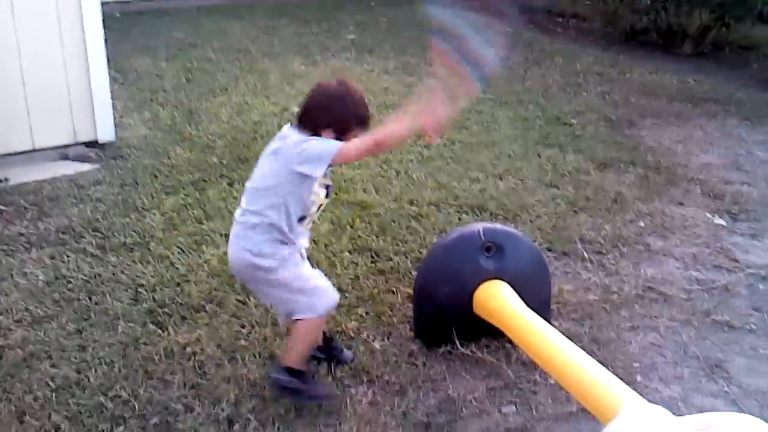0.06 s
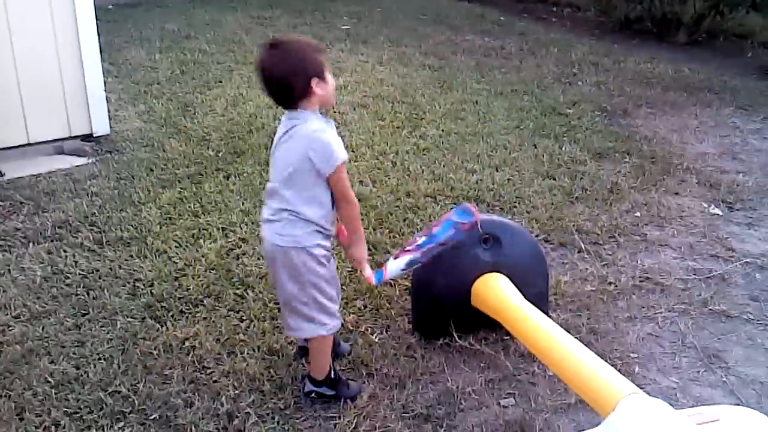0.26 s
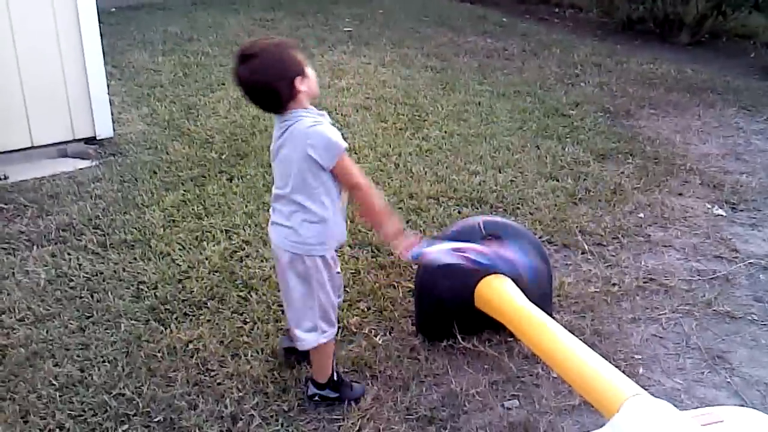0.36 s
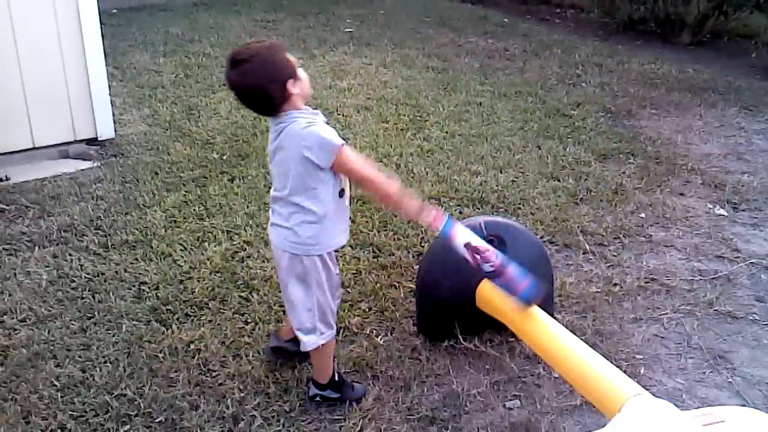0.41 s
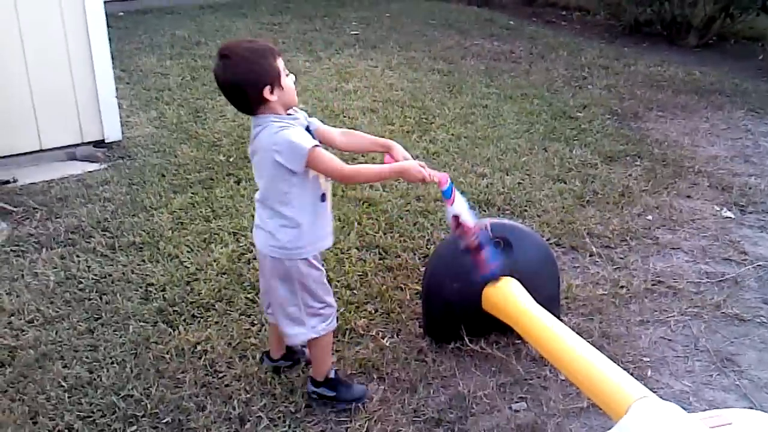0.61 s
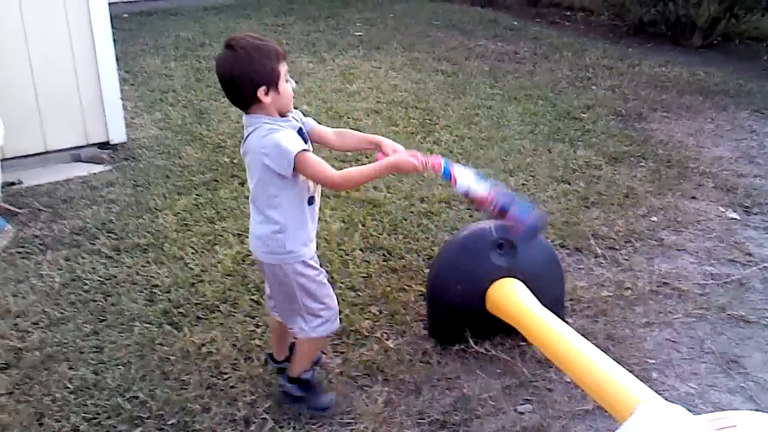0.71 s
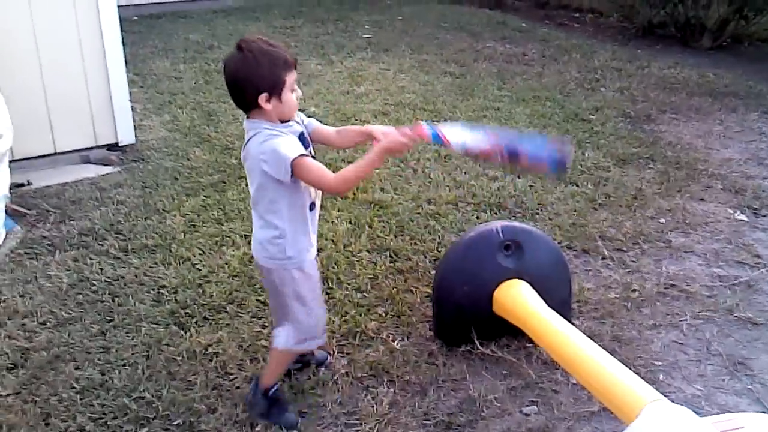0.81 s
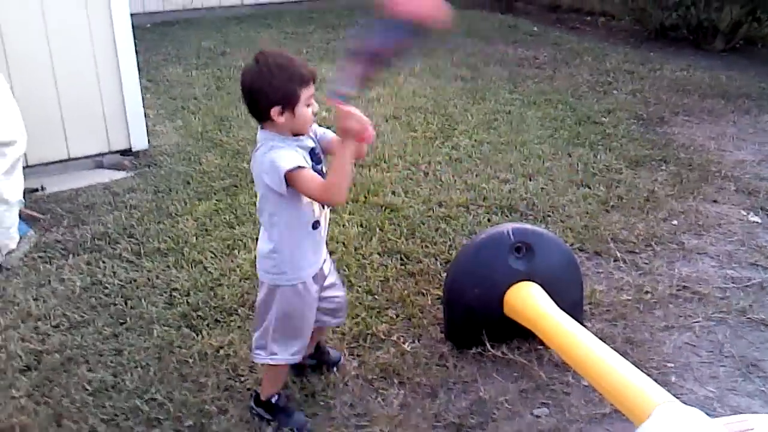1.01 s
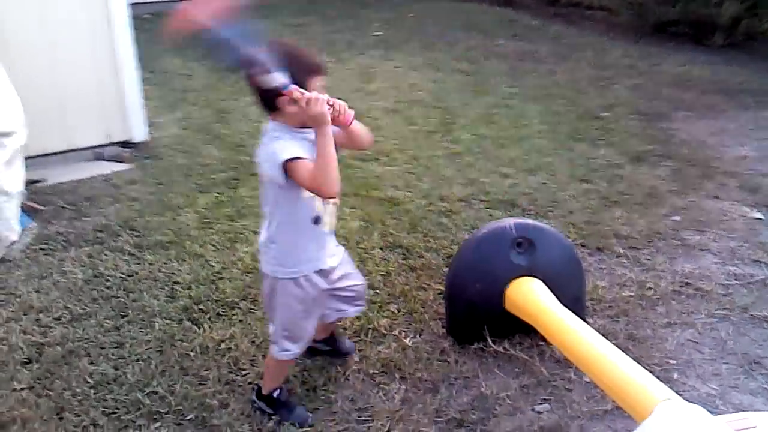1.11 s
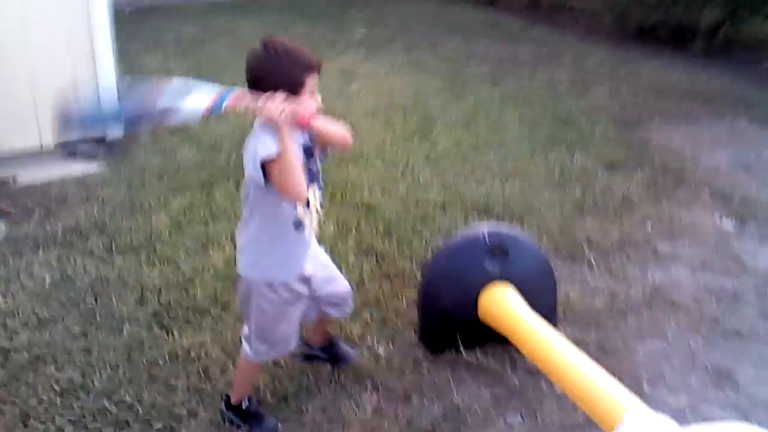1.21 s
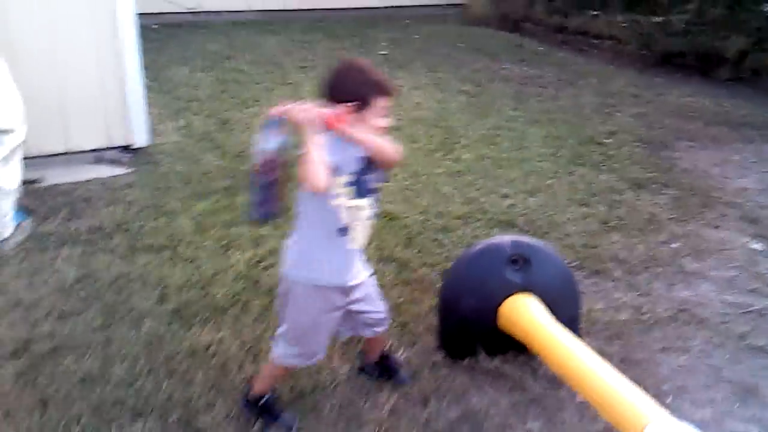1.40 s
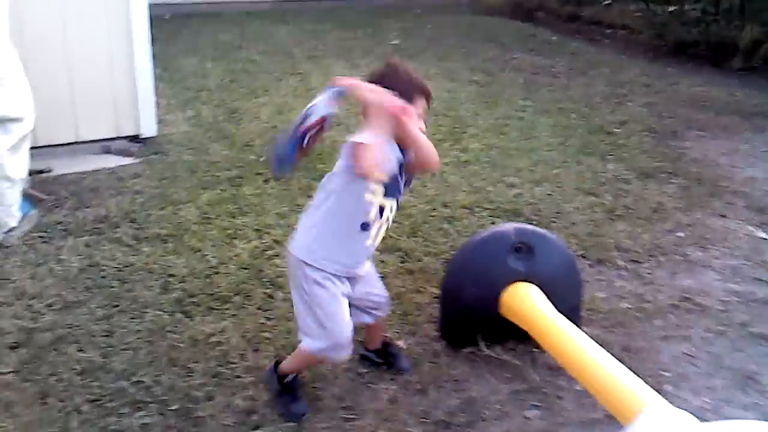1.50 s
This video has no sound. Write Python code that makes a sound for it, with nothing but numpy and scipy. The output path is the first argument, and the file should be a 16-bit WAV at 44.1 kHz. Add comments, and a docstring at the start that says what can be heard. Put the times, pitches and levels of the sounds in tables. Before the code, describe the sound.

A toy bat whacks the hollow plastic base of a toy basketball hoop once, close by in a quiet yard. A faint scrape and a few small plastic clicks follow, with soft rustling and a distant motor hum.

```python
"""On a lawn in a yard, a hollow toy bat whacks the hollow plastic base of a toy basketball hoop.
The impact dents the wall with a thump; as the bat flattens, each contact excites damped modes of cavity
and wall and a crack of dense high modes. The yard answers faintly by scattering and reflection.
The bat scrapes off the dome with sliding friction and, lifted, gives a few small plastic clicks.
Clothes and grass rustle, and the hum of a distant motor swells and sinks over quiet outdoor air."""
import sys
import numpy as np
from scipy import signal
from scipy.fft import rfft, irfft, next_fast_len
from scipy.io import wavfile

SR = 44100
rng = np.random.default_rng(int(sys.argv[2]) if len(sys.argv) > 2 else 0)


def master_out(mix):
    """Clip the mix to full scale and print it as 16-bit PCM to the path in sys.argv[1]."""
    frames = np.transpose(np.atleast_2d(mix))
    ceiling = np.clip(frames, -1, 1)
    pcm = np.round(ceiling * 32767).astype(np.int16)
    wavfile.write(sys.argv[1], SR, pcm)


N = 68355
T = np.arange(N) / SR


def from_db(db):
    """Amplitude ratio of a level in decibels."""
    return 10 ** (np.asarray(db) / 20)


def rms_one(x):
    """Normalisation to unit rms."""
    return x / np.sqrt(np.mean(x ** 2) + 1e-20)


def at_hz(table, hz, column=1):
    """Interpolation of a table column over log frequency."""
    table = np.array(table)
    return np.interp(np.log(hz + 1), np.log(table[:, 0]), table[:, column])


def noise(spectrum):
    """Spectral shaping of white noise, at unit rms."""
    size = next_fast_len(N)
    gain = from_db(at_hz(spectrum, np.fft.rfftfreq(size, 1 / SR)))
    return rms_one(irfft(rfft(rng.standard_normal(size)) * gain, size)[:N])


def filtered(x, kind, hz, order=2):
    """Maximally flat low-, high- or band-pass filtering."""
    return signal.sosfilt(signal.butter(order, hz, kind, fs=SR, output="sos"), x)


def impulses(times, db):
    """Impulsive excitation at the given times."""
    out = np.zeros(N)
    np.add.at(out, (np.atleast_1d(times) * SR).astype(int), from_db(db))
    return out


def through(x, response):
    """Convolution with an impulse response."""
    return signal.fftconvolve(x, response)[:N]


def decay(t60):
    """Exponential decay, by 60 dB in t60 seconds."""
    return np.exp(-np.log(1000) * T / t60)


def modes(table):
    """Superposition of damped modes, neighbours in opposite phase."""
    return sum((-1) ** k * from_db(db) * decay(t60) * np.sin(2 * np.pi * hz * T)
               for k, (hz, db, t60) in enumerate(table))


def dense_ring(table, rise_s, size=32768):
    """High modal overlap: noise whose third-octave bands each decay at their own rate."""
    hz = np.fft.rfftfreq(size, 1 / SR)
    coloured = irfft(rfft(rng.standard_normal(size)) * from_db(at_hz(table, hz)))
    spectrum = rfft(rms_one(coloured))
    edges = 60 * 2 ** (np.arange(26) / 3)
    ring = np.zeros(size)
    for low, high in zip(edges, edges[1:]):
        band = irfft(spectrum * (hz >= low) * (hz < high))
        t60 = at_hz(table, np.sqrt(low * high), column=2)
        ring += band * decay(t60)[:size]
    return ring * (1 - np.exp(-T[:size] / rise_s))


def waver(db, hz):
    """Random amplitude modulation: a gain that wanders at rates mostly below hz."""
    return from_db(db * noise([(hz, 0), (2 * hz, -20), (10 * hz, -120)]))


# spectrum of the outdoor air: f/Hz, relative spectral level/dB
AIR_SPECTRUM = [(20, -2), (50, -6), (90, 1), (140, 4), (190, -10), (300, -13), (420, -18.5), (650, -13.5),
                (950, -19.5), (1500, -21), (3000, -29.5), (7000, -33), (15500, -35.5)]

def air():
    """Ambient noise: broadband, strongest in the bass and nearly steady."""
    return from_db(-47) * noise(AIR_SPECTRUM) * waver(db=-0.5, hz=9)


# course of the motor's fundamental: t/s, level/dB, f/Hz
HUM_COURSE = [(0, -49.5, 120.5), (.15, -50.5, 119.6), (.45, -53, 119.4), (.62, -51, 115.2),
              (.76, -46, 114.9), (.93, -38, 117), (1.05, -41.5, 116.9), (1.22, -47, 116.7), (1.4, -51, 115),
              (1.55, -60, 115.6)]

def hum(overtone_hz=244):
    """Periodic vibration of a distant motor: a low tone that swells and sinks, and a faint overtone."""
    s, db, hz = np.transpose(HUM_COURSE)
    phase = 2 * np.pi * np.cumsum(np.interp(T, s, hz)) / SR
    tone = from_db(np.interp(T, s, db)) * np.sin(phase)
    overtone = from_db(-62.5) * waver(db=2, hz=5.5) * np.sin(2 * np.pi * overtone_hz * T)
    return np.sqrt(2) * (tone + overtone)


# swells as the child moves: t/s, level/dB, duration/s
RUSTLE_SWELLS = [(.86, -55, 0.23), (1.185, -48.5, 0.042), (1.275, -55, 0.19), (1.45, -56.5, .1)]  # clothes and grass, soft
BRUSH_SWELLS = [(.677, -51.5, 0.054), (1.44, -54.5, 0.04)]  # plastic and cloth, bright
# their spectra: f/Hz, relative spectral level/dB
RUSTLE_SPECTRUM = [(150, 9.5), (400, 1), (750, 6.5), (1500, 2), (2500, -7), (5000, -21.5), (14000, -32)]
BRUSH_SPECTRUM = [(800, -6.5), (2600, 5), (3900, -2), (4900, -10), (6100, -1), (7300, -11.5), (8600, -7),
                  (14000, -21)]

def rustle(swells, spectrum):
    """Friction noise of light rubbing, in bell-shaped swells."""
    envelope = sum(from_db(db) * np.exp(-(2 * (T - s) / length) ** 2) for s, db, length in swells)
    return envelope * noise(spectrum) * waver(db=3, hz=40.7)


# the bat's slide off the dome: t/s, level/dB, resonance f/Hz
SCRAPE_COURSE = [(0.636, -66, 2982), (.668, -56, 2700), (0.689, -49.5, 1974), (0.707, -51, 1996),
                 (.728, -50, 1814), (.765, -73, 1520)]
# spectrum of plastic rubbing on plastic: f/Hz, relative spectral level/dB
RUB_SPECTRUM = [(200, -22), (420, -6.5), (620, 2.5), (850, -8), (1400, -0.5), (2100, -7.5), (3500, -19.5),
                (8000, -24), (14000, -30)]

def scrape(bandwidth_hz=140, ring_db=-3.5):
    """Sliding friction: a grainy rub with a narrow resonance that sinks in pitch."""
    s, db, hz = np.transpose(SCRAPE_COURSE)
    phase = 2 * np.pi * np.cumsum(np.interp(T, s, hz)) / SR
    ring = rms_one(filtered(rng.standard_normal(N), "low", bandwidth_hz / 2) * np.sin(phase))
    envelope = np.interp(T, s, from_db(db), left=0, right=0)
    return envelope * (noise(RUB_SPECTRUM) + from_db(ring_db) * ring) * waver(db=-0.5, hz=120)


# clicks of the lifted bat: t/s, level/dB, low-pass f/Hz, T60/s
BAT_CLICKS = [(1.0569, -31.5, 2530, 0.016), (1.0631, -25.5, 814, 0.026), (1.0772, -37, 3000, 0.022),
              (1.0836, -30, 3520, 0.0086), (1.0852, -28.5, 1200, 0.017), (1.093, -39, 2000, 0.037),
              (1.102, -25, 1500, 0.022), (1.1051, -26, 3540, 0.017), (1.1100, -41, 11700, 0.11),
              (1.113, -25.5, 11100, 0.007)]
# their common spectrum: f/Hz, relative spectral level/dB
BAT_SPECTRUM = [(100, 1), (270, 11.5), (600, 2), (1100, 3), (2800, 4), (5000, -2), (12000, -2),
                (15000, -16)]

def bat_clicks():
    """Damped transients of thin plastic: short bursts of noise, some dull, some sharp."""
    out = np.zeros(N)
    for s, db, cutoff_hz, t60 in BAT_CLICKS:
        burst = rms_one(filtered(noise(BAT_SPECTRUM), "low", cutoff_hz)) * decay(t60)
        out += through(impulses(s, db), burst)
    return out


# snaps at first touch and as the bat's rattle ends: t/s, level before filtering/dB
EDGE_SNAPS = [(0.198, -27), (1.1129, -16)]

def snaps():
    """Hard edges meet so briefly that each contact radiates a single bright impulse."""
    s, db = np.transpose(EDGE_SNAPS)
    return filtered(impulses(s, db), "band", [2500, 12000], order=1)


# reverberation of the yard: f/Hz, relative spectral level/dB, T60/s
YARD_REVERB = [(60, 8.5, 1), (112, -13, 0.94), (202, 7, 0.53), (397, -2.5, 0.35), (590, -9.5, 0.43),
               (900, -3, 0.35), (2020, -5.5, 0.32), (2800, -12, 0.37), (4500, -15, 0.33),
               (7860, -22.5, 0.27), (9800, -56, 0.13), (15000, -51, 0.1)]

def yard(hit, echo_s=0.1, echo_db=-32.5):
    """Diffuse scattering by lawn and bushes, and one thin, dull reflection from a wall of the yard."""
    onset_s = BAT_CONTACTS[1][0]  # the contact with the loudest crack
    scattered = through(impulses(onset_s, db=-24.5), dense_ring(YARD_REVERB, rise_s=0.0092))
    thin = filtered(hit, "high", 500, order=1)
    echo = filtered(through(thin, impulses(echo_s, echo_db)), "low", 2900)
    return scattered + echo


# the plastic wall's thump, then its knock: t/s, peak level/dB, lower f/Hz, upper f/Hz
WALL_DENTS = [(.2019, -4.5, 131, 245), (.21255, -9.5, 800, 1060)]

def dents():
    """Heavily damped motion: the wall gives way in brief, band-limited swings."""
    out = np.zeros(N)
    for s, db, low_hz, high_hz in WALL_DENTS:
        swing = filtered(impulses(s, 0), "band", [low_hz, high_hz])
        out -= from_db(db) * swing / np.abs(swing).max()
    return out


# contacts within the one whack: t/s, then relative level/dB of cavity, wall and crack
BAT_CONTACTS = [(.1986, -21, -6, -5), (.20552, -7, -2, 0), (.21315, -1, 3, -5), (.21911, -.5, -9.5, -7),
                (.22587, -1, -13, -10), (.26356, -10, -27, -27)]
# modes of the base: f/Hz, relative level/dB, T60/s
CAVITY_MODES = [(88, -42, .6), (129.5, -31, .27), (155.5, -29, .26), (194, -15.5, .18), (256, -17.5, .155),
                (329, -21, .125), (410, -23.5, .115)]  # enclosed air and body
WALL_MODES = [(703, -22, .096), (842, -15.5, .061), (965, -14, .058), (1135, -27, .107), (1241, -23, .09),
              (1415, -23, .065), (1556, -24.5, .07), (1744, -17, .06), (1902, -21, .06), (2001, -26, .06),
              (2127, -28.5, .06), (2188, -27, .07)]  # plastic wall
# dense high modes of bat and base: f/Hz, relative spectral level/dB, T60/s
CRACK_BANDS = [(60.4, 1.5, .12), (150, 6, 0.092), (298, -6.5, 0.31), (585, -2.5, 0.18), (1420, -0.5, 0.077),
               (2220, 0, 0.07), (2830, -11.5, 0.034), (3680, -1, 0.05), (4640, -13.5, 0.066),
               (6700, -14.5, 0.041), (9060, -17, 0.03), (12500, -28, 0.03), (15000, -57, .03)]

def whack(wall_rise_s=0.0009, radiates_above_hz=117):
    """Impact excitation: the wall dents, and each contact rings cavity and wall and adds a crack."""
    s, cavity_db, wall_db, crack_db = np.transpose(BAT_CONTACTS)
    cavity = through(impulses(s, cavity_db + 1), modes(CAVITY_MODES))
    swing_up = 1 - np.exp(-T / wall_rise_s)
    wall = through(impulses(s, wall_db - 0.5), modes(WALL_MODES) * swing_up)
    ring = filtered(cavity + wall, "high", radiates_above_hz)  # a small body radiates bass poorly
    crack = sum(through(impulses(at, db - 15), dense_ring(CRACK_BANDS, rise_s=0.00027, size=8192))
                for at, db in zip(s, crack_db))
    return dents() + ring + crack


def scene():
    """Linear superposition of all sources in one channel."""
    hit = whack()
    friction = scrape() + rustle(RUSTLE_SWELLS, RUSTLE_SPECTRUM) + rustle(BRUSH_SWELLS, BRUSH_SPECTRUM)
    return (air() + friction + yard(hit) + bat_clicks() + snaps() + hum() + hit)[None]


def record(dry):
    """Soft saturation rounds the loudest peaks; a steep low-pass limits the bandwidth."""
    ceiling, cutoff_hz = 0.75, 16000
    rounded = dry / (1 + (dry / ceiling) ** 6) ** (1 / 6)
    return signal.sosfilt(signal.ellip(10, 0.1, 80, cutoff_hz, fs=SR, output="sos"), rounded)


dry = scene()
out = record(dry)
master_out(out)
```